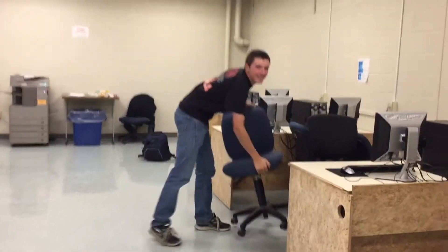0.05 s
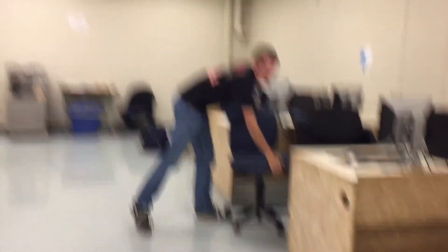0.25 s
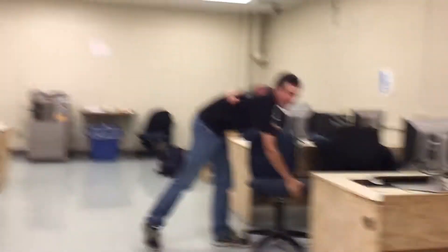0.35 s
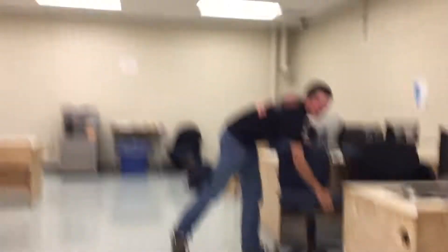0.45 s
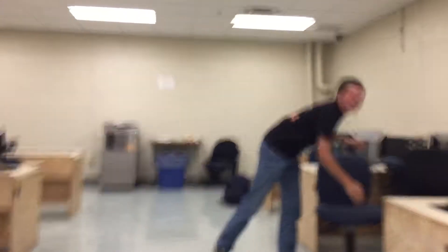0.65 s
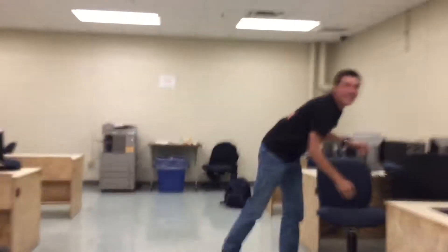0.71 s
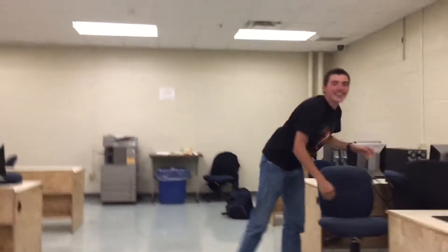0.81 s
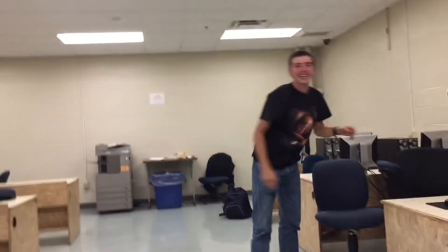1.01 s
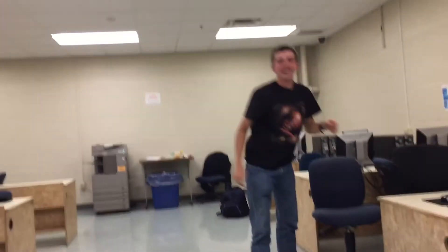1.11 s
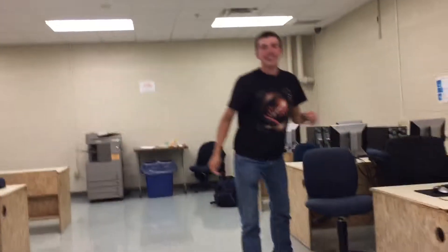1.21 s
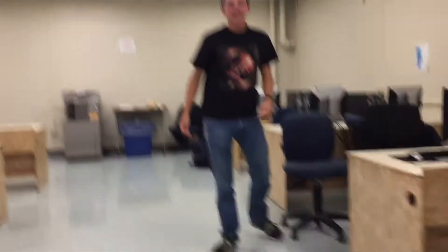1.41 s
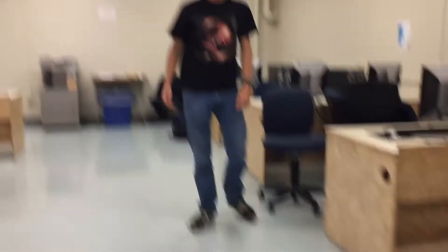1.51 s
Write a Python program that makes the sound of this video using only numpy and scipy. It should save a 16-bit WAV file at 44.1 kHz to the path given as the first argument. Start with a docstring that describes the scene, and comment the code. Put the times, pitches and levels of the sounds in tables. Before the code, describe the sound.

A swivel office chair is set down on tile a few metres away in a bare room. Its casters first whir and squeak faintly over soft steps. From 0.25 to 0.5 seconds they land in a ringing plastic clatter, loudest near 0.4, as the seat thumps. It rolls until 0.75. A small close tap follows, then soft steps, faint sole squeaks and a scuff until 1.5, over low ventilation.

```python
"""A bare room with a tile floor: a swivel office chair is set down a few metres away.
Its casters spin, whir and squeak in the air, then land one after another, rattling the plastic base
and setting it ringing. The seat thumps onto its column and the chair rolls a little.
Soft steps, a small close tap, faint sole squeaks and a shoe scuff sound over the ventilation."""
import sys
import numpy as np
from scipy import signal
from scipy.io import wavfile
from scipy.ndimage import uniform_filter1d

SR = 44100
rng = np.random.default_rng(int(sys.argv[2]) if len(sys.argv) > 2 else 0)


def materialize(psi):
    """Save the field psi as 16-bit PCM at rate SR to the path in sys.argv[1].

    A 1-D psi becomes a single channel; in a 2-D psi each row is a channel.
    """
    bounded = np.clip(np.atleast_2d(psi).T, -1, 1)
    quanta = np.round(bounded * 32767).astype(np.int16)
    wavfile.write(sys.argv[1], SR, quanta)


N = 68355
T = np.arange(N) / SR


def amp(db):
    """Decibels to gain."""
    return 10 ** (np.asarray(db) / 20)


def unit(x):
    """Scales to energy 1."""
    return x / np.sqrt(np.sum(x ** 2) + 1e-20)


def read(points, hz):
    """Reads a table on a log-frequency axis."""
    f, value = np.transpose(points)
    return np.interp(np.log(hz + 1), np.log(f + 1), value)


def add(mix, s, sound):
    """Mixes a sound in at s seconds."""
    part = mix[max(round(s * SR), 0):][:len(sound)]
    part += sound[:len(part)]


def pulse(points, size=4096):
    """A minimum-phase click with the given spectrum."""
    log_gain = np.log(amp(read(points, abs(np.fft.fftfreq(size, 1 / SR)))))
    return np.fft.ifft(np.exp(np.conj(signal.hilbert(log_gain)))).real[:size // 2]


def colour(x, points):
    """Filters by a spectrum, keeping the power of white input."""
    return signal.fftconvolve(x, unit(pulse(points)))[:len(x)]


def dying(x, t60s, size=256):
    """Lets each band die at its own speed."""
    hz, t, bands = signal.stft(x, SR, nperseg=size)
    decay = amp(-60 * t / np.maximum(read(t60s, hz), .005)[:, None])
    return signal.istft(bands * decay, SR, nperseg=size)[1][:len(x)]


def mode(hz, t60, t):
    """One dying resonance."""
    return np.sin(2 * np.pi * hz * t) * np.exp(-np.log(1000) * t / t60)


def wheel_clicks(levels, spectrum, per_s=4500, spread_db=1):
    """Dense tiny clicks of the wheels, coloured by their housings."""
    clicks = rng.standard_normal(N) * amp(spread_db * rng.standard_normal(N))
    clicks *= rng.random(N) < per_s / SR
    envelope = amp(np.interp(T, *np.transpose(levels), left=-np.inf, right=-np.inf))
    return np.sqrt(N) * unit(colour(clicks, spectrum)) * envelope


def squeaks(rows, rough, sag_per_s=.6):
    """Wavering tones that sink as the rubbing slows."""
    out = np.zeros(N)
    for s, width, hz, db in rows:
        waver = np.sqrt(N) * unit(uniform_filter1d(rng.standard_normal(N), size=70))
        pitch = hz * np.exp(-sag_per_s * (T - s) + rough * waver)
        swell = np.exp(-.5 * ((T - s) / width) ** 2)
        out += amp(db) * np.sin(2 * np.pi * np.cumsum(pitch) / SR) * swell
    return out


def thuds(rows, rise_s=.004):
    """Cushioned blows: each is one low damped resonance with a soft attack."""
    out, t = np.zeros(N), T[:SR // 2]
    for s, db, hz, t60 in rows:
        add(out, s, amp(db) * unit(mode(hz, t60, t) * (1 - np.exp(-t / rise_s))))
    return out


def room(x, wet_db=0, tail_db=-5, early_db=-7, build_s=.0073):
    """The direct sound, a few echoes from floor and desks, then a diffuse tail."""
    # Reverb decay. Each row: frequency in Hz, t60 in seconds.
    decay = [(80, 0.62), (250, 0.5), (1000, 0.63), (2500, 0.43), (5500, 0.44), (8000, .38), (12000, 0.32)]
    tail = unit(dying(rng.standard_normal(SR), decay) * (1 - np.exp(-T[:SR] / build_s)))
    early = np.zeros(SR)
    for s, strength in zip(rng.uniform(.002, .025, size=10), rng.standard_normal(size=10)):
        add(early, s, np.array([strength]))
    paths = amp(wet_db) * (amp(tail_db) * tail + amp(early_db) * unit(early))
    paths[0] += 1
    return signal.fftconvolve(x, paths)[:N]


def ventilation(level_db=-66.5):
    """Moving air lays down a steady, dark bed of noise."""
    # Tone of the air. Each row: frequency in Hz, gain in dB.
    spectrum = [(25, -15.5), (70, 5), (170, -1), (280, -11.5), (700, -13.5), (1300, -18), (1750, -14),
                (2400, -23.5), (5000, -27.5), (10000, -34), (16000, -35.5)]
    return amp(level_db) * colour(rng.standard_normal(N), spectrum)


def caster_spin():
    """The casters spin and rattle in the air."""
    # Envelope of the spin. Each row: time in seconds, level in dB.
    levels = [(0, -52.5), (.07, -57), (.16, -57), (.21, -65.5), (.24, -59), (.26, -73)]
    # Tone of the free wheels. Each row: frequency in Hz, gain in dB.
    spectrum = [(50, -15), (160, 7), (330, -1), (500, -9), (1300, -7.5), (2100, -4), (3100, -7.5),
                (4300, -9.5), (7000, -15), (16000, -25.5)]
    return wheel_clicks(levels, spectrum)


def axle_whir(stage_width_hz=240):
    """Friction noise in one narrow resonance that sinks as the wheels slow."""
    # Path of the whir. Each row: time in seconds, pitch in Hz, level in dB.
    path = [(0, 2150, -57.5), (.06, 1947, -57), (.15, 2043, -68), (.21, 1940, -70.5), (.24, 2007, -61),
            (0.599, 1886, -63), (.67, 1995, -58), (0.752, 1781, -66), (0.774, 1742, -100)]
    s, hz, db = np.transpose(path)
    pole = np.exp(-np.pi * stage_width_hz / SR)
    band = rng.standard_normal(N) + 1j * rng.standard_normal(N)
    for _ in range(2):
        band = signal.lfilter([1 - pole], [1, -pole], band)
    tone = (band * np.exp(2j * np.pi * np.cumsum(np.interp(T, s, hz)) / SR)).real
    return np.sqrt(N) * unit(tone) * amp(np.interp(T, s, db))


def axle_squeaks():
    """The caster axles rub and give rough squeaks."""
    # Each row: peak time in seconds, half-width in seconds, pitch in Hz, level in dB.
    rubs = [(.005, 0.016, 3150, -56), (.045, .012, 3030, -56.5), (.1, 0.026, 1003, -63.5),
            (.135, .014, 690, -62.5), (0.815, 0.0023, 2000, -63)]
    return squeaks(rubs, rough=.05)


def footsteps():
    """Feet land softly on the tile."""
    # Each row: start in seconds, level in dB, pitch in Hz, t60 in seconds.
    footfalls = [(.018, -20.5, 155.5, 0.1), (.1, -23.5, 108, 0.067), (.153, -22.5, 155.5, 0.13),
                 (.745, -24.5, 116, 0.034), (.835, -34.5, 110.4, 0.047), (1.088, -33, 160.6, .05),
                 (1.13, -30, 156, 0.043), (1.338, -33, 194.3, 0.046), (1.487, -35.5, 280.5, 0.048),
                 (1.495, -26.5, 153.7, 0.23)]
    return thuds(footfalls)


def landings(crack_db=-11.5, crack_s=.00078, rattle_db=-4, ring_db=-14.5):
    """Casters and base hit the tile, each from its own spot: a crack, a plastic rattle, a ring."""
    # Each row: start in seconds, level in dB, bass, treble and top EQ in dB, rattle length factor.
    hits = [(0.2414, -9, -5, 1, -4.5, 1.9), (0.2459, -5, -4.5, 3, -3, 1.5), (0.2568, -10, 2, -8, -9, 2.5),
            (0.275, -14.5, 3.5, -10, -14, 3), (.295, -16.5, 2.5, -7.5, -12, 3.3),
            (.317, -10, 5.5, -6.5, -15.5, 2.2), (0.3266, -6.5, -4.5, 7, 0.5, 2.6),
            (0.3426, -5.5, -6.5, -5.5, -4, 1.3), (.362, -13, -2.5, -4.5, -9, 0.76),
            (0.3936, -.5, -13, -4, 0, 1.2), (0.4011, 0.5, -2.5, 5, 0, 0.72), (0.4031, -1, -0.5, 2, -3, .9),
            (0.4096, -1, 6, -2.5, 6.5, 1.4), (0.421, -7.5, 5.5, -7, 11, 1.5),
            (0.4308, -8, 5.5, -1, 3.5, 2.8), (0.4663, -8.5, 2, -6, -6, 2.7)]
    # Tone of the plastic base. Each row: frequency in Hz, gain in dB.
    shell_spectrum = [(50, -20), (130, -9.5), (260, 1), (600, -0.5), (1200, -3), (1600, -3), (2100, 4),
                      (2900, 1.5), (4300, -2), (4900, -7), (5600, -8), (9500, -11), (11500, -14),
                      (16000, -23)]
    # Rattle decay. Each row: frequency in Hz, t60 in seconds before the length factor.
    shell_decay = [(200, 0.14), (900, 0.072), (2500, 0.05), (6000, 0.048), (14000, 0.028)]
    # Modes of base and column. Each row: pitch in Hz, relative level in dB, t60 in seconds.
    base_modes = [(242.6, -6.5, 0.49), (281.7, -5, .45), (356.4, -14, 0.52), (493, -8.5, 0.46),
                  (575, -10, 0.28), (844, -10, .45), (1285, -11, 0.26), (1990, -11.5, 0.35),
                  (2315, -5.5, 0.19), (2692, -7, 0.3), (3395, -2.5, 0.21), (4219, -11, .3), (5470, -6, .15)]
    bass_hz, mid_band_hz, treble_hz, top_hz = 450, (1800, 3420), 6840, 11900
    flat_mids = [(hz, 0) for hz in mid_band_hz]
    out, t = np.zeros(N), T[:SR // 2]
    for s, db, bass_db, treble_db, top_db, length in hits:
        crack_noise, shell_noise = rng.standard_normal((2, len(t)))
        crack = unit(crack_noise * np.exp(-t / crack_s))
        rattle = unit(dying(shell_noise, [(hz, t60 * length) for hz, t60 in shell_decay]))
        blow = colour(amp(crack_db) * crack + amp(rattle_db) * rattle, shell_spectrum)
        for hz, mode_db, t60 in base_modes:
            polarity = rng.choice([-1, 1])
            detune = 1 + .006 * rng.standard_normal()
            blow += amp(ring_db + mode_db) * polarity * unit(mode(hz * detune, t60, t))
        contact = pulse([(bass_hz, bass_db), *flat_mids, (treble_hz, treble_db), (top_hz, top_db)])
        add(out, s, room(amp(db) * signal.fftconvolve(blow, contact)))
    return out


def caster_clacks(partner_db=-7, spread=.15):
    """Hard wheels and loose parts clack: a quickly dying mode beats against a weaker neighbour."""
    # Each row: start in seconds, level in dB, pitch in Hz, t60 in seconds.
    clacks = [(.2445, -12, 3390, .1), (0.318, -18, 5960, .06), (0.3425, -9.5, 2740, .03),
              (0.3936, -3, 2640, .026), (0.4029, -3, 2780, .02), (0.4088, -3.5, 2200, .028),
              (.408, -11.5, 11490, .04), (.467, -19, 6940, 0.025)]
    out, t = np.zeros(N), T[:SR // 4]
    for s, db, hz, t60 in clacks:
        partner = amp(partner_db) * mode(hz * (1 + spread * rng.uniform(-1, 1)), t60, t)
        add(out, s, amp(db) * unit(mode(hz, t60, t) + partner))
    return out


def seat_thumps():
    """The seat settles onto its column in a run of dull blows."""
    # Each row: start in seconds, level in dB, pitch in Hz, t60 in seconds.
    blows = [(.248, -16.5, 337, 0.071), (.268, -16.5, 690, .06), (.266, -25, 76, .05),
             (.295, -18.5, 200, 0.085), (.31, -20.5, 107.6, .1), (.368, -17.5, 111, .06),
             (.408, -14.5, 246.3, .1), (.448, -11.5, 125, 0.044), (.458, -15.5, 70.5, 0.1),
             (.481, -10, 259.4, 0.13), (.499, -9.5, 270.5, 0.029), (.56, -19, 320, 0.024),
             (.575, -23.5, 82.6, 0.032), (.665, -28, 164, 0.14)]
    return thuds(blows)


def caster_roll():
    """The casters roll a short way over the tile."""
    # Envelope of the roll. Each row: time in seconds, level in dB.
    levels = [(.42, -80), (.5, -56), (.6, -52.5), (.65, -51), (.7, -57), (.745, -63), (.76, -82)]
    # Tone of wheels on tile. Each row: frequency in Hz, gain in dB.
    spectrum = [(50, -18.5), (160, 2), (400, -6), (600, 1), (1200, -11.5), (1900, -5), (4000, -10),
                (5000, -18), (7000, -18.5), (8500, -30), (16000, -44)]
    return wheel_clicks(levels, spectrum)


def close_taps(presence_hz=1800):
    """Small, dull, dry taps right beside the listener."""
    # Each row: start in seconds, level in dB, presence boost in dB.
    taps = [(0.7784, -23.5, 5.5), (.784, -31, 0), (0.7995, -36.5, 14), (0.8256, -45, 20)]
    # Tone of a tap. Each row: frequency in Hz, gain in dB.
    spectrum = [(60, 0), (300, 10), (600, 16), (1100, -4.5), (2000, -4), (3000, -18), (9000, -22.5),
                (16000, -51)]
    out = np.zeros(N)
    for s, db, boost_db in taps:
        presence = pulse([(presence_hz / 2, 0), (presence_hz, boost_db), (presence_hz * 2, 0)])
        add(out, s, amp(db) * unit(signal.fftconvolve(pulse(spectrum), presence)))
    return out


def sole_squeaks():
    """A rubbing sole gives faint, thin squeaks."""
    # Each row: peak time in seconds, half-width in seconds, pitch in Hz, level in dB.
    rubs = [(.87, .014, 1700, -72.5), (.98, 0.0098, 1558, -66), (1.145, .012, 1740, -68),
            (1.432, 0.015, 1710, -65), (1.485, 0.011, 1726, -70)]
    return squeaks(rubs, rough=.022)


def shoe_scuff(peak_s=1.182, half_width_s=.011, level_db=-64):
    """A sole brushes the tile in one brief swell of noise."""
    # Tone of the scuff. Each row: frequency in Hz, gain in dB.
    spectrum = [(300, -12), (1300, 1.5), (1900, -11), (2350, 2), (2700, -8), (3100, 3), (3600, -5),
                (5000, -6.5), (5550, 1), (6300, -12), (16000, -34)]
    swell = np.exp(-.5 * ((T - peak_s) / half_width_s) ** 2)
    return amp(level_db) * colour(rng.standard_normal(N), spectrum) * swell


def scene():
    """Chair and feet in the room, over the ventilation."""
    # A fade that pulls the chair's ringing down at the end. Each row: time in seconds, gain in dB.
    fade = [(.72, 0), (.8, -4.5)]
    air = ventilation()
    wheels = room(caster_spin() + caster_roll() + axle_whir(), wet_db=-5)
    steps = room(footsteps(), wet_db=-9.5)
    rubbing = room(shoe_scuff() + axle_squeaks() + sole_squeaks(), wet_db=-4.5)
    impacts = landings() + room(caster_clacks(), wet_db=-5) + room(seat_thumps(), wet_db=-6.5)
    chair = (impacts + wheels) * amp(np.interp(T, *np.transpose(fade)))
    return (chair + steps + rubbing + close_taps() + air)[None]


def record(dry):
    """A steep low-pass trims the highest treble."""
    edge_hz = 15950
    low_pass = signal.firwin(411, edge_hz, window=("kaiser", 8), fs=SR)
    return signal.oaconvolve(dry, low_pass[None], "same")


dry = scene()
out = record(dry)
materialize(out)
```